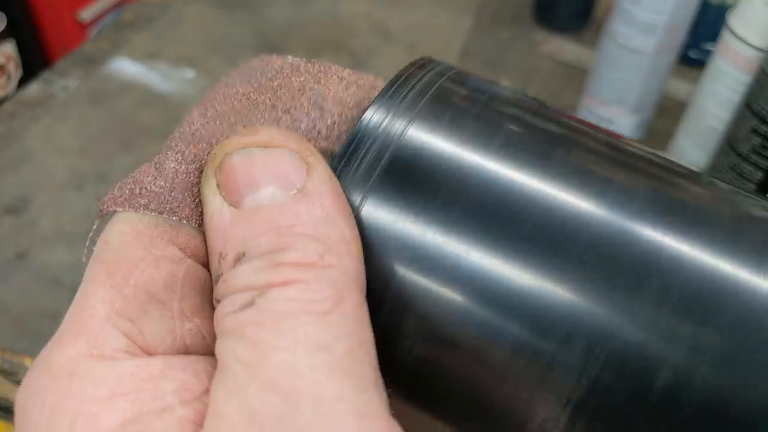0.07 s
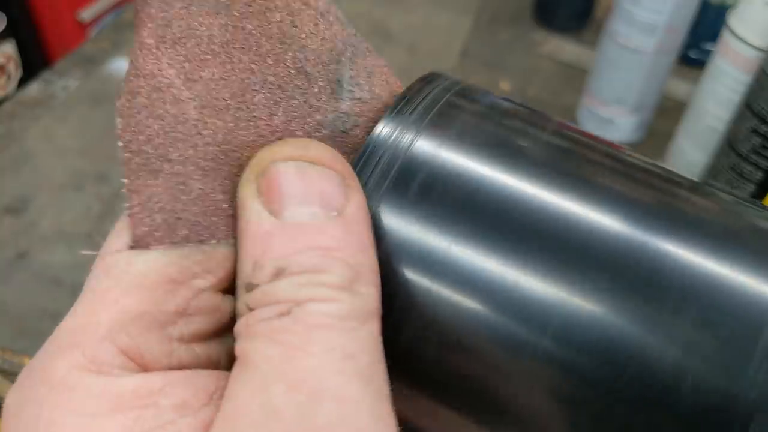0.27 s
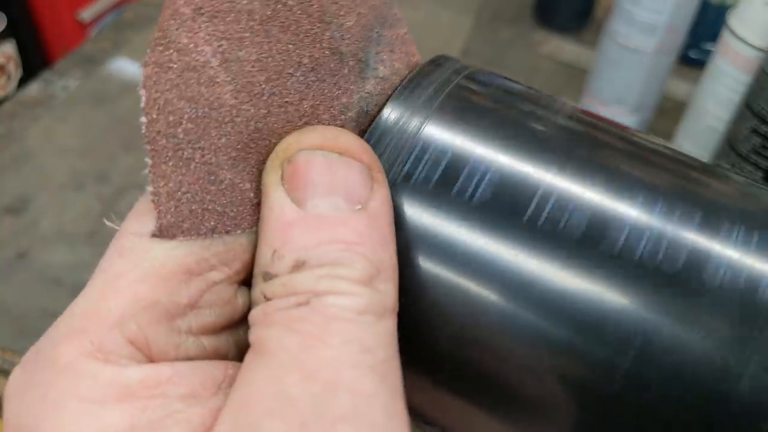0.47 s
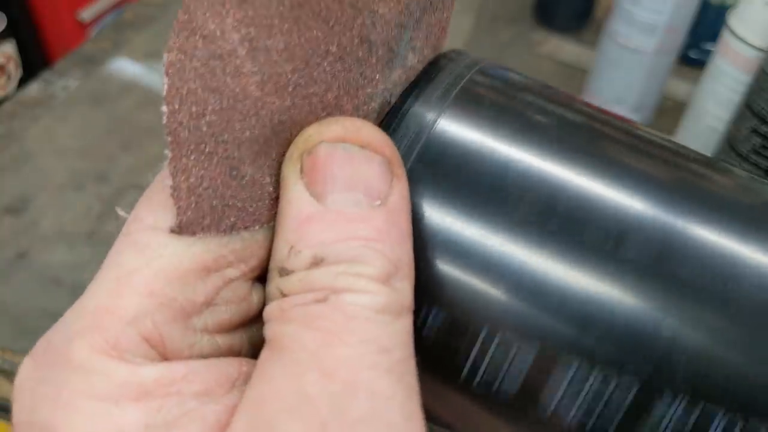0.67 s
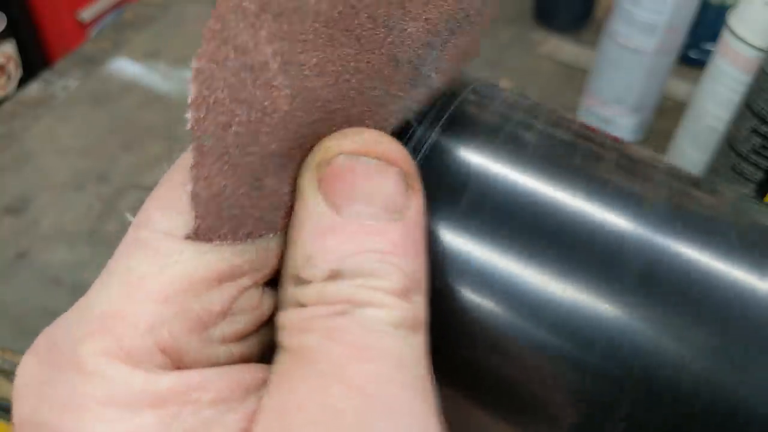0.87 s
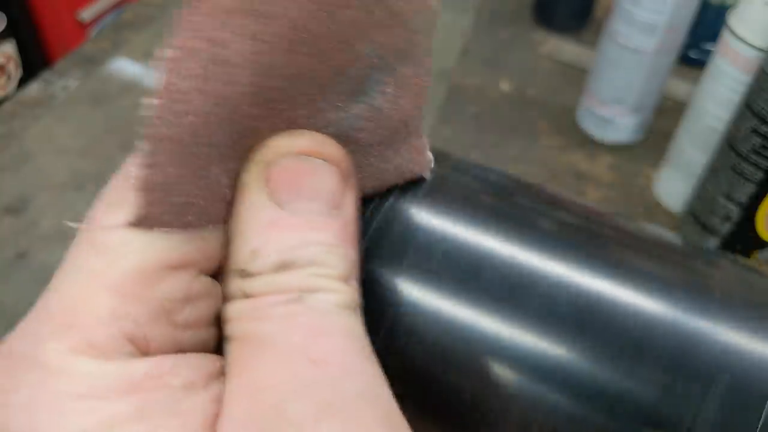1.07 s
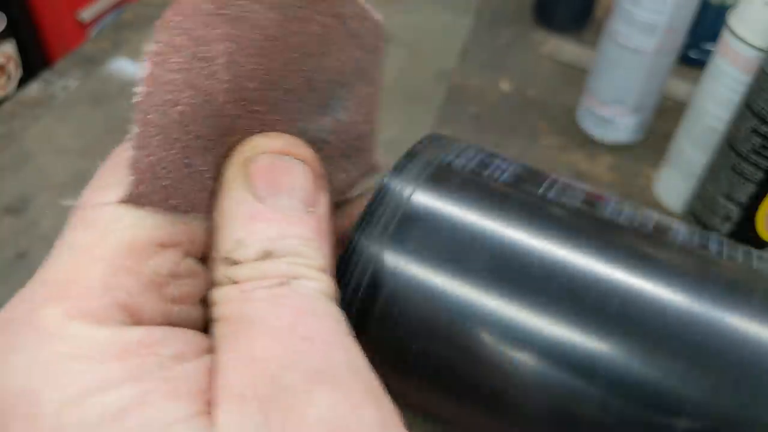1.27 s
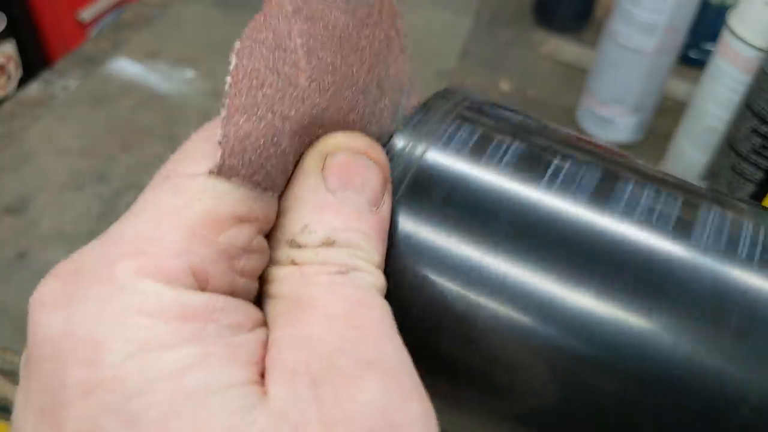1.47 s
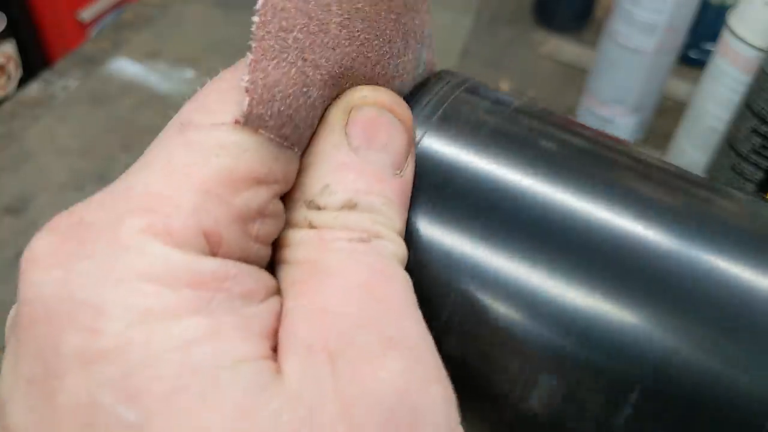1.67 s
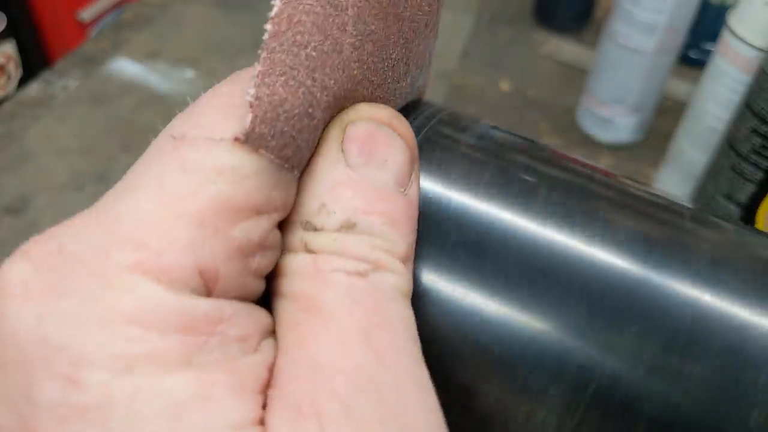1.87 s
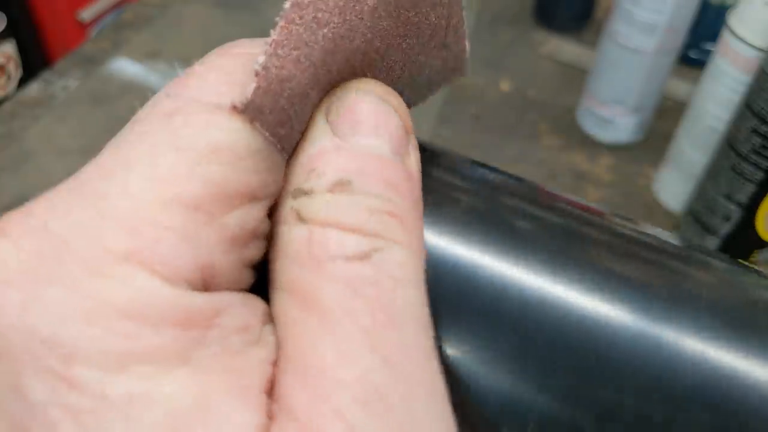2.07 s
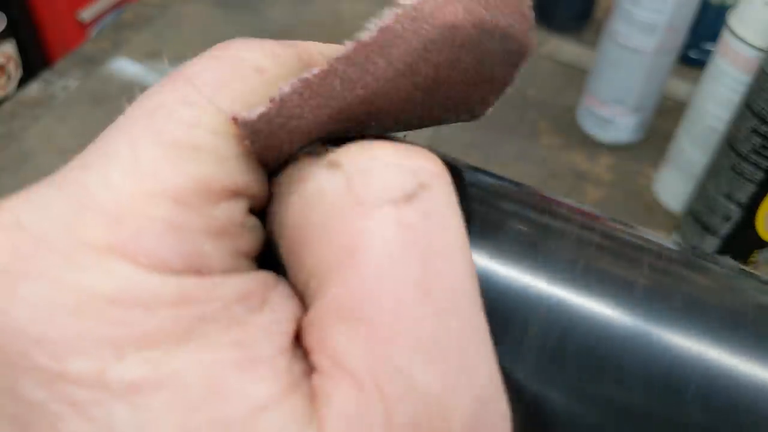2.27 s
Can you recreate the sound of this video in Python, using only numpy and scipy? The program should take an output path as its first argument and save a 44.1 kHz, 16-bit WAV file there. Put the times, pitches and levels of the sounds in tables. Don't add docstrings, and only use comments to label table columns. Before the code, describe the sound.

Drill motor whirring down, slow, then fast, with gritty sandpaper scraping a plastic pipe and a hard stop clunk

```python
import sys
import numpy as np
from scipy import signal
from scipy.fft import rfft, irfft
from scipy.io import wavfile
from scipy.ndimage import uniform_filter1d

SR = 44100
rng = np.random.default_rng(int(sys.argv[2]) if len(sys.argv) > 2 else 0)


def attenuation_scalar(level_db):
    decades = np.asarray(level_db, float) / 20
    return 10 ** decades


def materialize(psi):
    bounded = np.clip(np.atleast_2d(psi).T, -1, 1)
    quanta = np.round(bounded * 32767).astype(np.int16)
    wavfile.write(sys.argv[1], SR, quanta)


N = 102444


def clock():
    return np.arange(N) / SR


def set_rms(x, db):
    return x * attenuation_scalar(db) / np.sqrt(np.mean(x ** 2))


def curve(rows, column=1):
    rows = np.array(rows, float)
    return np.interp(clock(), rows[:, 0], rows[:, column])


def colour(x, spectrum):
    points = np.array(spectrum, float)
    hz = np.arange(1025) * SR / 2048 + 1
    log_gain = np.interp(np.log(hz), np.log(points[:, 0]), points[:, 1]) * np.log(10) / 20
    cepstrum = irfft(log_gain)
    cepstrum[1:1024] *= 2
    cepstrum[1025:] = 0
    return signal.fftconvolve(x, irfft(np.exp(rfft(cepstrum))))[:N]


def ring(x, peaks):
    out = x
    for hz, width_hz, db in peaks:
        out = out + attenuation_scalar(db) * signal.lfilter(*signal.iirpeak(hz, hz / width_hz, fs=SR), x)
    return out


def walk(rate_hz):
    hold = int(SR / rate_hz)
    steps = np.repeat(rng.standard_normal(N // hold + 1), hold)
    drift = uniform_filter1d(uniform_filter1d(steps, hold), hold)[:N]
    return drift / drift.std()


# (time [s], mesh pitch [Hz], whine level [dB],
# overtones over whine [dB], second gear stage over whine [dB])
RUNDOWN_BURST = [(0, 1352, -35, -14, -9), (.05, 1300, -38, -14, -9), (.095, 1240, -36, -14, -9),
                 (.125, 1110, -33, -14, -9), (.155, 1000, -32, -14, -9), (.195, 890, -32, -14, -9),
                 (.215, 770, -42, -12, 0), (.25, 590, -43, -14, 7), (.275, 470, -44, -16, 2),
                 (.31, 310, -43, -16, -14), (.33, 275, -56, -16, -14)]
SLOW_BURST = [(.394, 230, -52, -4, 0), (.42, 232, -49, 2, 2), (.5, 242, -50, 0, 2), (.6, 247.5, -50, 1, 4),
              (.74, 253, -51, 3, 3), (.79, 256, -58, 2, 6), (.88, 260, -56, 1, 7), (.97, 263, -57, 2, 10),
              (1.05, 258, -58, 4, 8), (1.085, 247, -57, 8, 6), (1.112, 240, -58, 9, 4)]
FAST_BURST = [(1.308, 240, -52, -6, 4), (1.345, 370, -40, -8, 6), (1.365, 470, -44, -6, 5),
              (1.39, 540, -43, -10, 4), (1.41, 680, -36, -19, 0), (1.419, 800, -46, -19, 0),
              (1.428, 965, -32, -19, -6), (1.46, 1068, -31, -19, -12), (1.5, 1048, -31, -19, -12),
              (1.6, 1056, -31, -19, -12), (1.74, 1051, -30, -19, -12), (1.76, 1020, -39, -17, -12),
              (1.8, 985, -36, -16, -12), (1.86, 900, -37, -13, -12), (1.905, 835, -37, -11, -12),
              (1.93, 790, -50, -8, -6), (1.955, 720, -43, -10, 0), (1.975, 580, -39, -14, 0),
              (1.995, 450, -41, -14, 0), (2.02, 230, -44, -14, 0)]
# (time the high side meets the paper [s], wobble depth [dB])
RIM_WOBBLE = [
    (.06, 1),
    (.59, 1),
    (1.47, .5),
]
MESH_PER_TURN = 51.7
STAGE_RATIO, STAGE_TOP_HZ = 2.54, 2300
COAST_S, WOBBLE_FADE_S = .01, .19
GLIDE_ROUGH = .012


def motion():
    t, out = clock(), np.zeros((5, N))
    for rows, (high_s, wobble_db) in zip((RUNDOWN_BURST, SLOW_BURST, FAST_BURST), RIM_WOBBLE):
        fade_in = t - rows[0][0] + COAST_S
        fade_out = rows[-1][0] + COAST_S - t
        on = np.clip(np.minimum(fade_in, fade_out) / COAST_S, 0, 1)
        hz = uniform_filter1d(curve(rows), size=300)
        glide = np.minimum(np.abs(np.gradient(np.log(hz))) * SR / 8, 1)
        phase = np.cumsum(hz * (1 + (.004 + GLIDE_ROUGH * glide) * walk(90))) / SR
        gain = on * attenuation_scalar(curve(rows, column=2) + 3.0 * glide * walk(60))
        over = gain * attenuation_scalar(curve(rows, column=3))
        stage = gain * attenuation_scalar(curve(rows, column=4)) * np.exp(-(STAGE_RATIO * hz / STAGE_TOP_HZ) ** 6)
        turn = (phase - phase[int(high_s * SR)]) / MESH_PER_TURN
        wear = np.exp(-(np.maximum(t - high_s, 0) / WOBBLE_FADE_S) ** 2)
        wobble = on * wobble_db * wear * np.cos(2 * np.pi * turn)
        out += [phase * (on > 0), gain, over, stage, wobble]
    return out


# (multiple of mesh pitch, level [dB])
MESH_OVERTONES = [(2, 3), (3, 2.5), (4, 5.5), (5, -13.5)]
# (frequency [Hz], width [Hz], level [dB])
TONE_SWELL = [(970, 143, 5)]


def whine(phase, gain, over, stage):
    def tone(multiple):
        return 2 ** .5 * np.sin(2 * np.pi * multiple * phase) * attenuation_scalar(2.1 * walk(70))

    overtones = sum(attenuation_scalar(db) * tone(multiple) for multiple, db in MESH_OVERTONES)
    inner = over * overtones + stage * tone(STAGE_RATIO)
    return gain * tone(1) + ring(inner, TONE_SWELL)


# (time [s], rattle level [dB])
MOTOR_EFFORT = [(0.0, -29.5), (0.066, -30.5), (0.088, -27), (0.104, -32), (0.316, -33), (0.345, -38.5),
                (0.37, -38), (0.426, -35), (1.01, -34), (1.11, -38.5), (1.19, -45), (1.222, -53.5),
                (1.245, -44.5), (1.285, -43.5), (1.305, -33.5), (1.36, -32), (1.616, -31.5), (1.91, -39.5),
                (1.92, -30), (1.938, -37), (1.952, -33), (1.975, -34.5), (1.995, -38), (2.01, -35)]
# (frequency [Hz], level [dB per Hz])
RATTLE_COLOUR = [(60, -51), (150, -23.5), (350, -10), (700, -3), (1500, -1), (3500, 0), (8000, -6),
                 (15000, -51)]
BRAKE_S, BRAKE_DULL_HZ = 1.88, 4560
STOP_S, STOP_DB_PER_S = 2.015, -900


def rattle(phase):
    t = clock()
    puff = 1.1 + np.exp(-(phase % 1))
    noise = rng.standard_normal(N) * puff * attenuation_scalar(walk(160))
    teeth = set_rms(colour(noise, RATTLE_COLOUR), 1.05)
    dull = signal.sosfilt(signal.butter(2, BRAKE_DULL_HZ, fs=SR, output="sos"), teeth)
    braked = np.clip((t - BRAKE_S) / 0.017, 0, 1)
    stop_db = STOP_DB_PER_S * np.maximum(t - STOP_S, 0)
    return attenuation_scalar(curve(MOTOR_EFFORT) + stop_db) * (teeth + braked * (dull - teeth))


# (time [s], level [dB], ring [s])
KNOCK_HITS = [
    (1.108, -30, 0.01),
    (1.335, -25, 0.069),
    (1.811, -21.5, .012),
    (1.919, -36, 0.039),
    (1.950, -22.5, 0.053),
    (1.9999, -8.5, 0.011),
    (2.008, -24, 0.038),
]
# (frequency [Hz], level [dB])
GEARBOX_MODES = [(950, 1.5), (1250, -0.5), (1700, 1.5), (3150, -2.5), (4600, -17), (8000, -46)]


def knocks():
    out, t = np.zeros(N + 4000), np.arange(4000) / SR
    chances = rng.random((len(KNOCK_HITS), len(GEARBOX_MODES)))
    for (start_s, db, ring_s), blow_chances in zip(KNOCK_HITS, chances):
        modes = 0
        for (hz, mode_db), chance in zip(GEARBOX_MODES, blow_chances):
            mode_hz = hz * (1 + 0.12 * (chance - .5))
            modes = modes + attenuation_scalar(mode_db) * np.sin(2 * np.pi * (mode_hz * t + chance))
        crack = np.diff(rng.standard_normal(len(t) + 1))
        decay = np.exp(-np.log(1000) * t / ring_s)
        attack = 1 - np.exp(-t / 0.0004)
        start = int(start_s * SR)
        out[start:start + len(t)] += attenuation_scalar(db) * (0.22 * modes + 0.038 * crack) * decay * attack
    return out[:N]


# (time [s], scrape level [dB])
PAPER_PRESSURE = [(0, -24), (.2, -24), (.3, -34.5), (.355, -50), (.39, -37), (.79, -32.5), (1.04, -33.5),
                  (1.19, -46.5), (1.222, -64), (1.25, -39), (1.288, -52), (1.31, -30.5), (1.39, -27.5),
                  (1.445, -28), (1.5, -22), (1.54, -25), (1.6, -22), (1.68, -22), (1.75, -27.5),
                  (1.85, -30.5), (1.89, -42.5), (2.1, -67.5), (2.27, -68), (2.32, -60.5)]
# (frequency [Hz], level [dB per Hz])
GRIT_COLOUR = [(800, -30), (2000, -11), (4000, -2), (6500, -1.5), (9000, -2.5), (12000, -5.5),
               (15500, -9.5)]
# (time [s], length [s], extra scrape [dB])
RIM_BITES = [
    (1.403, 0.027, 7.5),
    (1.454, 0.027, 8),
    (1.508, 0.015, 3.5),
    (1.55, 0.029, 4.5),
    (1.596, 0.047, 4),
    (1.67, .02, 1.5),
    (1.711, .012, 3),
    (1.763, .02, 4),
    (1.806, 0.048, 4),
]
BITE_ATTACK_S, BITE_RELEASE_S = 0.0057, .008


def scrape(wobble_db):
    t = clock()
    noise = rng.standard_normal(N)
    grain_db = 1.55 * rng.exponential(size=N) + 0.73 * walk(150) + 0.54 * walk(16.0)
    grit = noise * attenuation_scalar(grain_db)
    bite_db = 0
    for start_s, length_s, db in RIM_BITES:
        rise = (t - start_s) / BITE_ATTACK_S
        fall = 1 + (start_s + length_s - t) / BITE_RELEASE_S
        bite_db = bite_db + db * np.clip(np.minimum(rise, fall), 0, 1)
    return attenuation_scalar(curve(PAPER_PRESSURE) + wobble_db + bite_db) * set_rms(colour(grit, GRIT_COLOUR), -2.82)


# (frequency [Hz], width [Hz], level [dB])
AIR_COLUMN = [(290, 32, 9.5), (957, 62, 4.5), (996, 56, 8), (1475, 250, -6.5), (2143, 65, 0.5)]
# (frequency [Hz], width [Hz], level [dB])
PIPE_WALL = [(3110, 110, -3), (3460, 120, 5), (3930, 220, 5), (4470, 150, -0.5), (4900, 100, -8),
             (7600, 300, -2), (8600, 900, -2)]
# (frequency [Hz], width [Hz], level [dB])
DRILL_CASING = [(3440, 40, 18), (3990, 90, 8)]


def pipe_and_shell(teeth, blows, grit):
    gears = teeth + blows
    air = ring(teeth, AIR_COLUMN) + 1.45 * blows
    wall = ring(grit + 0.094 * gears, PIPE_WALL)
    return air + wall + .33 * ring(gears, DRILL_CASING)


# (time [s], pitch [Hz], level [dB])
PIPE_HUM = [(0.0, 298.3, -43.5), (0.07, 329, -39), (0.2, 301.5, -36.5), (0.3, 308, -59), (0.32, 309.5, -35),
            (0.56, 308.3, -61), (0.62, 303, -55), (1.15, 310.3, -48.5), (1.2, 319, -58), (1.35, 288.4, -64),
            (1.39, 309, -57), (1.58, 311.3, -36.5), (1.65, 298.6, -74), (1.68, 307.9, -40.5),
            (1.9, 313, -59.5), (2.02, 317.3, -40), (2.23, 316, -69), (2.24, 319, -82)]


def hum():
    phase = np.cumsum(curve(PIPE_HUM) + 4.15 * walk(40.17)) / SR
    return 2 ** .5 * np.sin(2 * np.pi * phase) * attenuation_scalar(curve(PIPE_HUM, column=2) + 1.6 * walk(30.23))


# (time [s], level [dB], length [s])
GRIP_THUDS = [
    (0.044, -40.5, 0.06),
    (0.155, -50, 0.05),
    (0.732, -60, 0.034),
    (1.114, -56, 0.027),
    (1.202, -54, 0.023),
    (1.278, -55, .03),
    (1.79, -56, .02),
    (1.906, -47.5, 0.039),
    (2.024, -53, 0.06),
    (2.22, -66, .04),
]
THUD_HZ = 117.5


def thuds():
    t = clock()
    band = signal.butter(2, [THUD_HZ * 0.81, THUD_HZ * 3.07], "band", fs=SR, output="sos")
    low = set_rms(signal.sosfilt(band, rng.standard_normal(N)), 0)
    swells = sum(attenuation_scalar(db) * np.exp(-((t - s) / length_s) ** 2) for s, db, length_s in GRIP_THUDS)
    return low * swells


ROOM_T60_S, ROOM_DB = .29, -13.5


def room(x):
    t = np.arange(int(.5 * SR)) / SR
    decay = np.exp(-np.log(1000) * t / ROOM_T60_S)
    tail = rng.standard_normal(len(t)) * decay * (t > .004)
    tail = signal.lfilter([1], [1, -.4], tail)
    return signal.fftconvolve(x, attenuation_scalar(ROOM_DB) * tail / np.sqrt(np.sum(tail ** 2)))[:N]


# (frequency [Hz], level [dB per Hz])
FLOOR_COLOUR = [(15, -25.5), (25, -12), (155, -10), (539, -20), (722, -21.5), (1820, -22.5), (7420, -42),
                (8470, -34.5), (14000, -51.5)]
FLOOR_DB = -64
RUSTLE_S, RUSTLE_RISE_S, RUSTLE_DB = 2.265, .03, 4.5


def quiet_floor():
    noise = rng.standard_normal(N) * attenuation_scalar(walk(13.4))
    rustle = np.clip((clock() - RUSTLE_S) / RUSTLE_RISE_S, 0, 1)
    return set_rms(colour(noise, FLOOR_COLOUR), FLOOR_DB) * attenuation_scalar(RUSTLE_DB * rustle)


def scene():
    phase, gain, over, stage, wobble_db = motion()
    teeth, blows = rattle(phase), knocks()
    tones = whine(phase, gain, over, stage)
    near = pipe_and_shell(teeth, blows, scrape(wobble_db))
    floor = quiet_floor()
    mono = near + tones + room(near + .5 * tones) + hum() + thuds() + floor
    return np.array([mono, mono])


def roll_off(x):
    return signal.sosfilt(signal.butter(12, 15710, fs=SR, output="sos"), x)


def record(dry):
    return roll_off(dry)


dry = scene()
out = record(dry)
materialize(out)
```